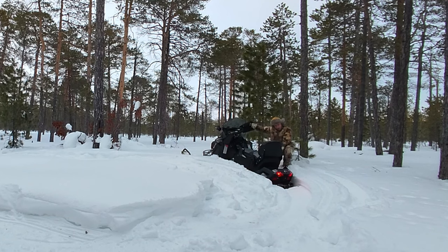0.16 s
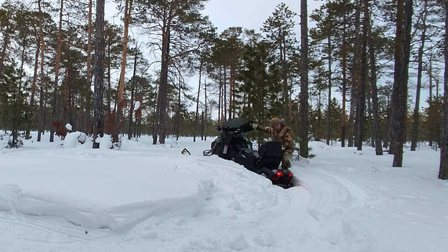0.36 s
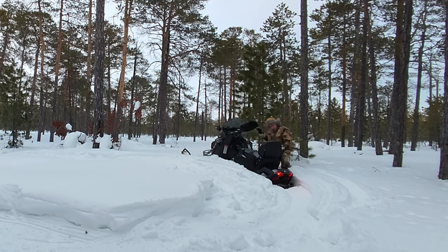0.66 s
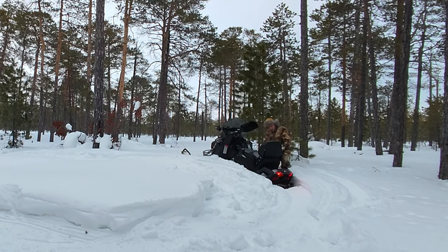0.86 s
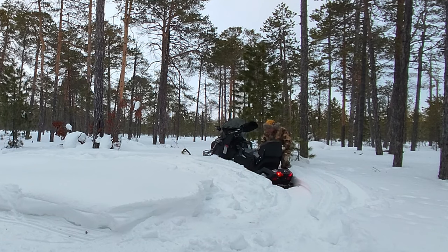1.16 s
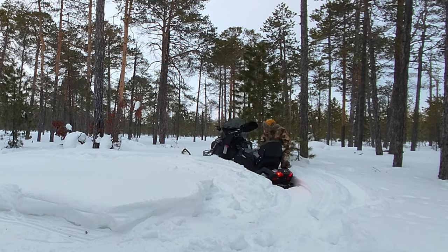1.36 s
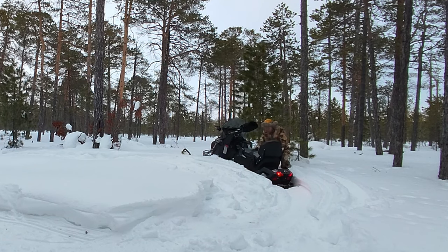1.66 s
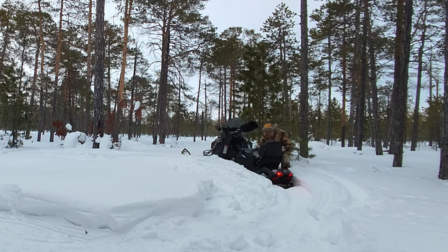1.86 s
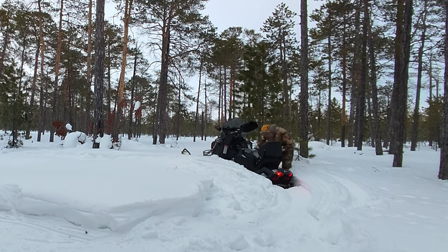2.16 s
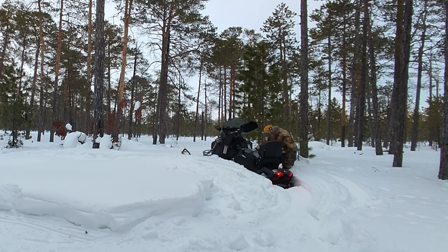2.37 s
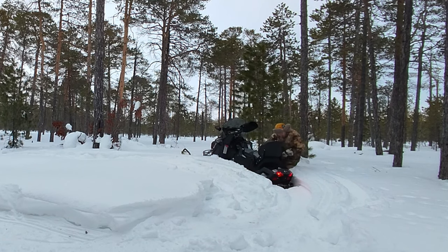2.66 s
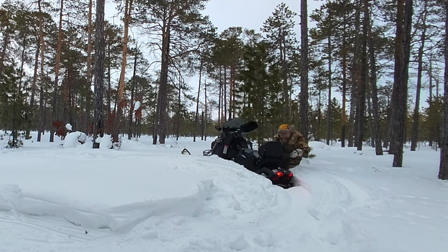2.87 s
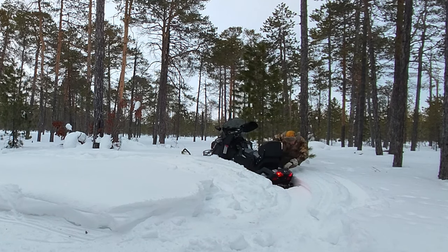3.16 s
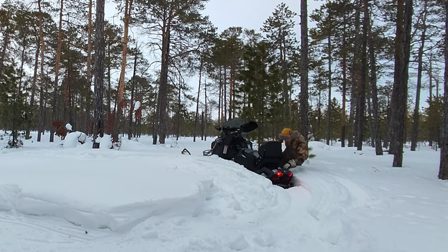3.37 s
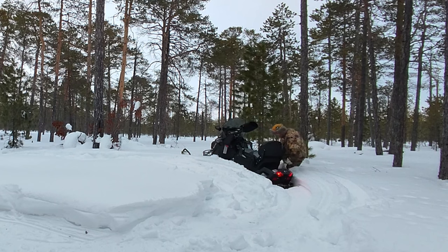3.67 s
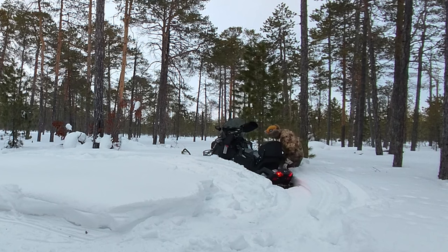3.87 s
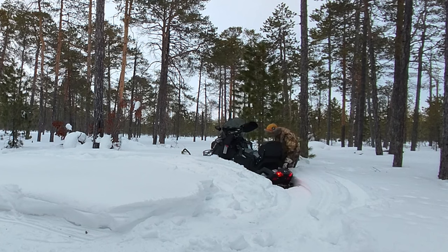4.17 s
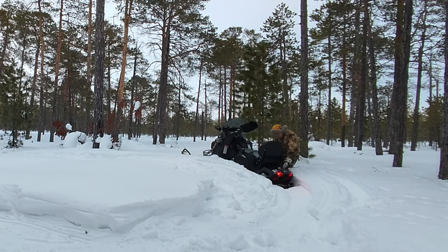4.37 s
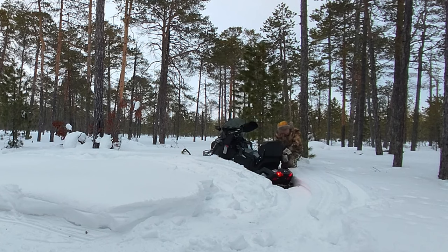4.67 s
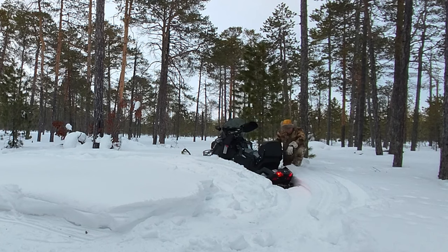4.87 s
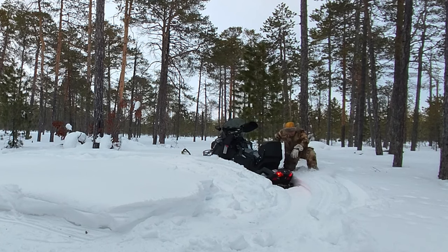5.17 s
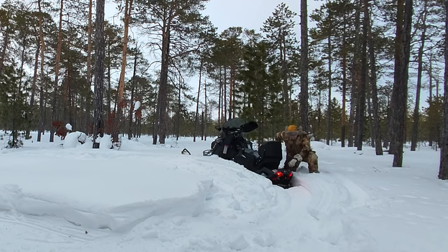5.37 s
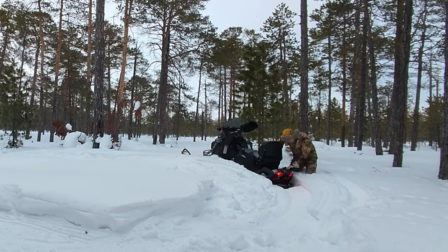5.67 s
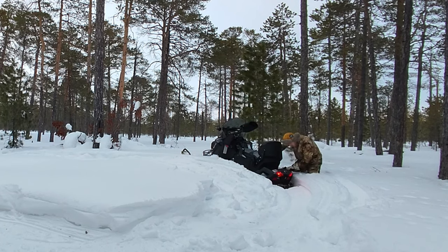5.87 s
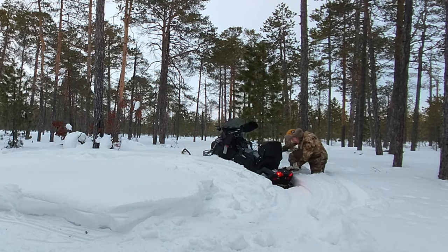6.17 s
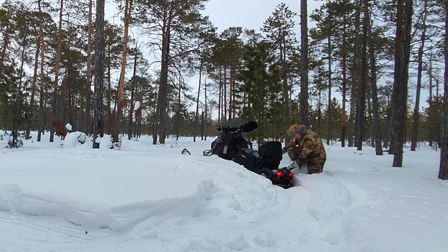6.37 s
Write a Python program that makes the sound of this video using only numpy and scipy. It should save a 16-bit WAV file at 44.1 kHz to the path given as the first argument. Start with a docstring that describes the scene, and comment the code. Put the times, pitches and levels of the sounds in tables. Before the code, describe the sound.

A snowmobile idles continuously at a moderate distance in open snowy woods, a deep, fast, lumpy putter with frequent stumbles and slightly harder beats. Faint mechanical knocking, belt slap and fan rush sit under the boom. The rider handles the load: soft crisp rustles throughout, a dull bump near one second, a sharper snap and knock past five and a half. Scattered tree echoes and light hiss surround it; a stationary stereo microphone hears the engine slightly right.

```python
"""A snowmobile putters at idle some way off in a snowy pine forest, and now and then a firing burns badly. Each
firing sends a puff of gas that sets the muffler booming; a deep rumble runs beneath. Under the hood pistons and
clutch knock faintly, the drive belt slaps, and fan and intake rush. Scattered echoes come back off the trunks.
The rider handles the load: filtered noise makes the rustles and snaps of his clothes, and short ringing tones
make the bumps. Soft air and hiss lie under it all."""
import sys
import numpy as np
from scipy import signal
from scipy.fft import rfft, irfft, next_fast_len
from scipy.io import wavfile

SR = 44100
rng = np.random.default_rng(int(sys.argv[2]) if len(sys.argv) > 2 else 0)


def generate_wav(signal):
    """Clip the signal to [-1, 1] and save it as 16-bit WAV at the path in sys.argv[1]."""
    frames = np.transpose(np.atleast_2d(signal))
    scaled = np.clip(frames, -1, 1) * 32767
    pcm = np.round(scaled).astype(np.int16)
    wavfile.write(sys.argv[1], SR, pcm)


N = 287091
TIME = np.arange(N) / SR   # seconds

# Firings that burn badly, or unusually hard.
# Each row: time in seconds, strength in dB against a normal firing.
ODD_FIRINGS = [(0.185, -9), (0.369, -0.5), (0.519, -1.5), (0.59, -3.5), (0.742, -4), (1.082, -2),
               (1.156, -2), (1.306, -1.5), (1.525, -3), (1.635, -2), (1.847, -6.5), (2.156, 3), (2.301, -8),
               (2.414, -2.5), (2.595, -2), (2.777, -2.5), (2.967, -10.5), (3.19, -13), (3.337, 0.5),
               (3.37, -3), (3.523, -1.5), (3.787, 2), (4.08, -2), (4.223, -0.5), (4.257, 1), (4.294, -1),
               (4.511, -1.5), (4.577, 2.5), (4.939, -1.5), (5.121, -0.5), (5.156, -3), (5.267, -2),
               (5.375, -2.5), (5.448, -2), (5.63, -2.5), (6.346, -3.5)]
# Ringing of crankcase, clutch and hood.
# Each row: pitch in Hz, width of the resonance in Hz, relative level in dB.
CASING = [(494, 77, -1), (682, 110, -4), (825, 65, 1), (1019.4, 26.5, 5), (1181, 48, -4), (1349, 49, 0.5),
          (1572, 75, 2), (1760, 112, 1), (2976, 260, -4.5), (3943, 260, -3.5), (5024, 230, -6.5),
          (5950, 630, -15)]


def from_db(db):
    """Decibels to gain."""
    return 10 ** (np.asarray(db) / 20)


def rms_one(x):
    """Scale to an rms (average strength) of 1."""
    return x / np.sqrt(np.mean(x ** 2) + 1e-20)


def noise(*shape):
    """Plain white noise."""
    return rng.standard_normal(shape)


def colour(x, spectrum):
    """Filter by a curve of (Hz, dB) points, joined along a logarithmic pitch scale."""
    hz, db = np.transpose(spectrum)
    size = next_fast_len(N + 4096)
    bins = np.maximum(np.fft.rfftfreq(size, 1 / SR), 1)
    gain = from_db(np.interp(np.log(bins), np.log(hz), db))
    return irfft(rfft(x, size) * gain, size)[..., :N]


def low_pass(x, hz, order=2):
    """Take away the treble with a Butterworth filter."""
    sections = signal.butter(order, min(hz, SR / 2 - 1), fs=SR, output="sos")
    return signal.sosfilt(sections, x + 1e-18)


def resonate(x, hz, width_hz):
    """Ring one resonance, with gain 1 at its peak; a narrow one rings longer."""
    r = np.exp(-np.pi * width_hz / SR)
    feed = np.array([1, 0, -1]) * (1 - r * r) / 2
    feedback = [1, -2 * r * np.cos(2 * np.pi * hz / SR), r * r]
    return signal.lfilter(feed, feedback, x + 1e-18)


def clicks(at, heights, size=N):
    """Single-sample clicks at the given samples."""
    return np.bincount(np.clip(at, 0, size - 1).astype(int), heights, size)


def fade(x, seconds):
    """Give each click an exponential tail."""
    return signal.lfilter([1], [1, -np.exp(-1 / (seconds * SR))], x + 1e-18)


def passes(cycle, share):
    """Samples at which the crank passes a given share of its cycle."""
    return np.flatnonzero(np.diff(np.floor(cycle - share)) > 0)


def air():
    """Still air and hiss: steady coloured noise, separate at each ear."""
    # Each row: frequency in Hz, relative level in dB per Hz.
    air_curve = [(25, 29), (50, 31), (100, 15.5), (250, 6), (420, 11), (1000, 12), (2500, 7.5),
                 (5000, -0.5), (8200, -5.5), (8800, -16.5), (12600, -16.5), (13300, -1), (15400, 0)]
    return rms_one(colour(noise(2, N), air_curve))


def forest(x, t60):
    """Trunks scatter the sound into many echoes that weaken with delay and differ at each ear."""
    # Tone of the echoes. Each row: frequency in Hz, gain in dB.
    echo_tone = [(40, -22.5), (170, -34), (400, -20), (800, -15), (1500, -9.5), (2500, -8), (4000, -5.5),
                 (15000, 0.5)]
    delay_s = rng.uniform(.004, .7, (2, 600))
    height = noise(*delay_s.shape) * from_db(-60 * delay_s / t60)
    # the engine was running before, so its echoes are there from the start
    running = np.r_[x[-SR:], x]
    ears = []
    for d, h in zip(delay_s, height):
        echoes = np.bincount((d * SR).astype(int), h / np.linalg.norm(h))
        ears.append(signal.fftconvolve(running, echoes)[SR:SR + N])
    return colour(np.array(ears), echo_tone)


def rustling(stir_db, stir_swing_db, stir_hz, crinkle_db, crinkle_hz, grain_db):
    """Clothes and snow rustle: grainy noise swells as folds catch and let go; the rider is never quite still."""
    # Each row: time of the peak in seconds, level in dB, spread of the swell in seconds.
    rustles = [(.27, -74.5, .12), (0.397, -74, 0.063), (0.577, -72, .025), (1.778, -72, .02),
               (2.005, -72.5, .04), (2.242, -73, .03), (2.898, -78, 0.033), (3.345, -70, .011),
               (3.66, -82, .03), (4.607, -70, .022), (4.66, -72, .012), (4.978, -77, .025),
               (5.125, -75, 0.1), (5.226, -72, .014), (5.294, -76, 0.042), (5.55, -82, 0.023),
               (5.687, -71.5, 0.17), (6.27, -71, 0.071), (6.409, -65, 0.016), (6.445, -71, 0.016),
               (6.493, -69, 0.022)]
    # Tone of the rustles. Each row: frequency in Hz, relative level in dB per Hz.
    rustle_tone = [(1500, -8.5), (4000, 9.5), (7500, 5.5), (10000, 2.5), (12300, -2), (13500, 3),
                   (15200, -6)]
    swell = sum(from_db(db) * np.exp(-.5 * ((TIME - s) / spread) ** 2) for s, db, spread in rustles)
    stir = from_db(stir_db + stir_swing_db * rms_one(low_pass(noise(N), stir_hz)))
    crinkle = from_db(crinkle_db * rms_one(low_pass(noise(N), crinkle_hz)))
    grain_size = np.minimum(rng.exponential(1, (2, N)), 6)
    grains = noise(2, N) * from_db(grain_db * grain_size)
    return np.hypot(swell, stir) * crinkle * rms_one(colour(grains, rustle_tone))


def snapping(snap_s):
    """Stiff cloth and buckles snap: bursts of noise start at once and die away."""
    # Each row: start in seconds, starting level in dB, pitch in Hz, width in Hz.
    snaps = [(1.753, -66, 5500, 4970), (3.35, -69, 9000, 6000), (4.621, -64, 10000, 4000),
             (5.231, -66, 10200, 800), (5.268, -65, 10200, 800), (5.625, -58, 4000, 4000),
             (6.404, -82, 10000, 6000), (6.438, -71, 9800, 4000)]
    out = 0
    for s, db, hz, width in snaps:
        burst = fade(clicks(np.array([s * SR]), [from_db(db)]), snap_s)
        out = out + burst * rms_one(resonate(noise(2, N), hz, width))
    return out


def bumping(soft_hz):
    """The load is bumped and rings briefly; it is soft, so the treble is dulled."""
    # Each row: start in seconds, peak level before dulling in dB, pitch in Hz, width in Hz.
    bumps = [(.981, -45, 526, 59), (5.622, -50, 1150, 130), (5.627, -46.5, 1180, 130)]
    out = 0
    for s, db, hz, width in bumps:
        ring = resonate(clicks(np.array([s * SR]), [1.]), hz, width)
        out = out + from_db(db) * ring * SR / (2 * np.pi * width)   # a narrow bump peaks as high as a wide one
    return low_pass(out, soft_hz)


def rush(cycle, throb_db, throb_share, fan_db, fan_turns, gust_db, gust_hz):
    """Air through fan and intake chuffs twice a cycle, never twice alike, and flutters with the fan."""
    # Each row: frequency in Hz, relative level in dB per Hz.
    rush_tone = [(100, -4), (280, 12), (400, 1), (850, 0), (1100, -5), (1300, -2), (1480, -12.5),
                 (1700, -3.5), (2200, -5), (3900, -19), (4600, -19), (5200, -14), (7000, -22.5),
                 (10000, -30)]
    gusts = gust_db * rms_one(low_pass(noise(N), gust_hz))
    throb = throb_db * np.cos(2 * np.pi * 2 * (cycle - throb_share))
    flutter = fan_db * np.cos(2 * np.pi * fan_turns * cycle)
    return rms_one(colour(noise(N), rush_tone)) * from_db(throb + flutter + gusts)


def belt(cycle, turns, uneven_db, slap_s):
    """The slack drive belt slaps once a lap: a short gritty burst that rings the casing differently each time."""
    at = passes(turns * cycle, 0)
    grit, out = noise(N), 0
    for k, (hz, width, db) in enumerate(CASING[:8]):
        spread = np.clip(noise(len(at)), -2, 2)
        slaps = clicks(at, from_db(db + uneven_db * spread))
        out = out + (-1) ** k * resonate(fade(slaps, slap_s) * grit, hz, width)
    return rms_one(out)


def clatter(cycle, uneven_db, jitter_s, chatter, chatter_s):
    """Pistons and clutch knock at set points of the crank's turn, chatter briefly and ring the casing."""
    # Each row: place as a share of the engine cycle, relative level in dB, brightness in Hz.
    contacts = [(.01, -3, 2200), (.18, -2, 1400), (.48, 0, 600), (.56, -2.5, 2400), (0.712, -5.5, 1500),
                (.92, -2, 3500)]
    force = 0
    for share, db, bright_hz in contacts:
        at = passes(cycle, share)
        size, slip = noise(len(at), 2).T
        knocks = clicks(at + slip * jitter_s * SR, from_db(db + uneven_db * size))
        after = chatter * fade(knocks, chatter_s) * noise(N)
        force = force + low_pass(knocks + after, bright_hz, order=1)
    out = 0
    for k, (hz, width, db) in enumerate(CASING):
        out = out + (-1) ** k * from_db(db) * resonate(force, hz, width)
    return rms_one(out)


def rumble():
    """A deep, low rumble: coloured noise."""
    # Each row: frequency in Hz, relative level in dB per Hz.
    rumble_tone = [(10, -18), (24, -6), (33, -4.5), (41, -0.5), (65, -4), (110, 4), (180, -5.5), (240, -17),
                   (600, -55.5)]
    return rms_one(colour(noise(N), rumble_tone))


def crank(start_cycle, lag_cycles, recover_s, hunt_hz, hunt_width_hz, hunt_cycles):
    """Engine cycles turned so far: weak firings set the crank back, hard ones push it on, and the idle hunts."""
    # Idle speed, creeping up overall. Each row: time in seconds, firings per second.
    speed = [(0.0, 26.68), (0.38, 26.46), (0.76, 26.59), (1.15, 26.63), (1.53, 27.74), (1.91, 26.78),
             (2.29, 26.97), (2.68, 27.16), (3.06, 26.82), (3.44, 26.96), (3.82, 26.57), (4.21, 28.38),
             (4.59, 27.79), (4.97, 27.76), (5.35, 27.24), (5.74, 27.2), (6.12, 28.49), (6.5, 28.62)]
    cycle = start_cycle + np.cumsum(np.interp(TIME, *np.transpose(speed))) / SR
    for s, db in ODD_FIRINGS:
        since = np.maximum(TIME - s, 0) / recover_s
        # the shift is greatest after recover_s, then fades
        cycle = cycle - lag_cycles * (1 - from_db(db)) * since * np.exp(-since)
    hunting = low_pass(resonate(noise(N), hunt_hz, hunt_width_hz), 2 * hunt_hz)
    return cycle + hunt_cycles * rms_one(hunting)


def exhaust(cycle, uneven_db, mode_uneven_db, lope, jitter_s, rebound, puff_hz, gas_noise, dull_hz,
            pipe_echo, pipe_delay_s, growl_db, growl_hz, growl_width_hz, growl_delay_s):
    """One puff of gas per firing rings the muffler, each with its own timing, strength and colour."""
    # Muffler resonances. Each row: pitch in Hz, width in Hz, relative level in dB,
    # dB of change per dB of firing strength, relative swell after a bad firing.
    muffler = [(61.5, 12.6, 20, 1, 0.81), (103.9, 54, 11, 1.5, 0.58), (181.24, 16.25, 27, 1, 0.061),
               (283, 18, 0, 0, 0.38), (33, 24, 5, -0.5, .7)]
    # Failed charges that burn late in the pipe, as a dull thump. Each row: time in seconds, relative level in dB.
    late_burns = [(0.179, -7), (1.854, -15), (2.303, -8), (2.974, -22), (3.187, -2.5), (4.68, -12),
                  (4.84, -15)]
    lead_in = SR // 10   # samples of room for a firing before the start
    size = N + lead_in
    at = passes(cycle, 0)
    at = np.r_[2 * at[0] - at[1], at]
    chance = noise(len(at), len(muffler) + 2).T

    # leftover gas takes a share of a strong firing's excess from the next two, so the idle lopes
    strength_db = uneven_db * signal.lfilter([1], [1, lope, lope], chance[0])
    unburnt = np.zeros(len(at))
    for s, db in ODD_FIRINGS:
        k = np.argmin(abs(at / SR - s))
        strength_db[k] = db
        unburnt[k] = max(1 - from_db(db), 0)
    extra = rebound * np.roll(unburnt, 1)   # unburnt fuel feeds the next firing
    at = at + lead_in + jitter_s * SR * chance[1]

    thump_s, thump_db = np.transpose(late_burns)
    thumps = low_pass(clicks(thump_s * SR + lead_in, from_db(thump_db), size), dull_hz)
    turbulence = 1 + gas_noise * noise(size)
    boom = 0
    for sign, (hz, width, db, follows, swell), own in zip((1, 1, -1, 1, 1), muffler, chance[2:]):
        height = (from_db(follows * strength_db) + swell * extra) * from_db(mode_uneven_db * own)
        # each puff comes again, weaker, after a round trip through the pipe
        again = pipe_echo * clicks(at + pipe_delay_s * SR, height, size)
        puffs = low_pass(clicks(at, height, size) + again, puff_hz)
        boom = boom + sign * from_db(db) * resonate(puffs * turbulence + thumps, hz, width)

    # the port shuts on the returning wave: a second, sharper kick that growls above the boom
    kicks = clicks(at + growl_delay_s * SR, from_db(strength_db), size)
    growl = resonate(resonate(kicks, growl_hz, growl_width_hz), growl_hz, growl_width_hz)
    return (boom + from_db(growl_db) * growl)[lead_in:]


def scene():
    """The machine stands a little to the right, so its direct sound reaches the left ear later."""
    cycle = crank(start_cycle=.297, lag_cycles=.155, recover_s=.05,
                  hunt_hz=4.6, hunt_width_hz=3.0, hunt_cycles=.017)
    engine = from_db(-1.5) * exhaust(
        cycle, uneven_db=0.43, mode_uneven_db=0.53, lope=0.25, jitter_s=0.00045, rebound=.95,
        puff_hz=172.4, gas_noise=0.05, dull_hz=73.5, pipe_echo=0.3, pipe_delay_s=0.012233,
        growl_db=-4.5, growl_hz=292, growl_width_hz=69, growl_delay_s=0.00881)
    engine = engine + from_db(-59.5) * rumble()
    engine = engine + from_db(-61.0) * clatter(cycle, uneven_db=1.2, jitter_s=.0004,
                                               chatter=0.15, chatter_s=0.0072)
    engine = engine + from_db(-69.5) * belt(cycle, turns=.674, uneven_db=2.5, slap_s=0.0043)
    engine = engine + from_db(-59) * rush(cycle, throb_db=2, throb_share=0.026, fan_db=1.5, fan_turns=3.16,
                                          gust_db=2.0, gust_hz=29.2)
    left_lag_s = .00015
    left = np.r_[np.zeros(round(left_lag_s * SR)), engine][:N]
    direct = np.array([left, engine])
    rider = rustling(stir_db=-83.5, stir_swing_db=2.2, stir_hz=7, crinkle_db=1.1, crinkle_hz=110, grain_db=2.2)
    rider = rider + snapping(snap_s=0.0053) + bumping(soft_hz=2500)
    return direct + forest(engine, t60=0.65) + rider + from_db(-61.0) * air()


def record(dry):
    """Cut the treble steeply above 15550 Hz with an elliptic filter."""
    return signal.sosfilt(signal.ellip(12, .1, 90, 15550, fs=SR, output="sos"), dry)


dry = scene()
out = record(dry)
generate_wav(out)
```